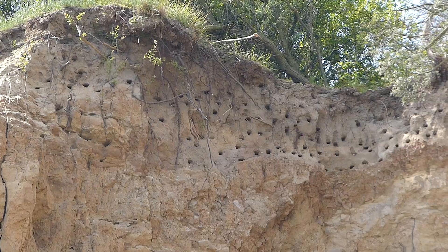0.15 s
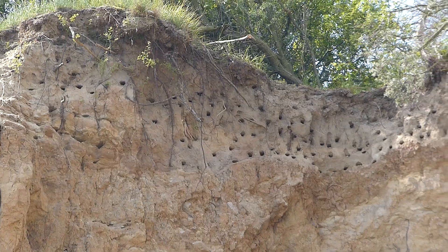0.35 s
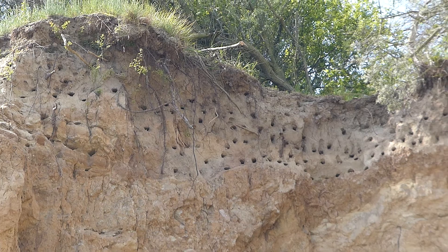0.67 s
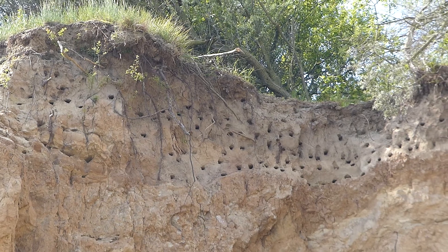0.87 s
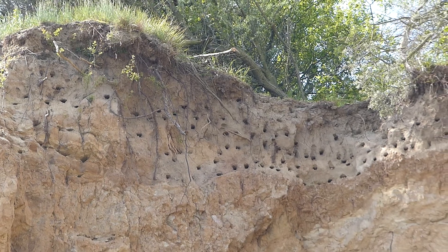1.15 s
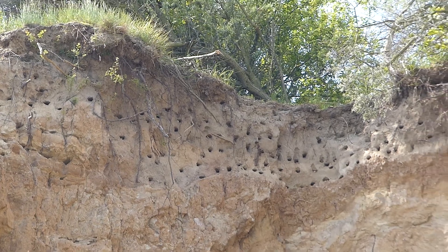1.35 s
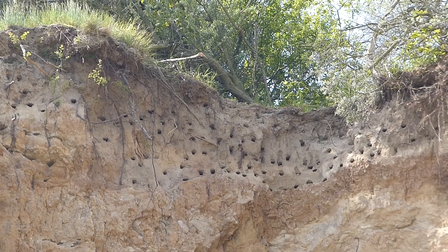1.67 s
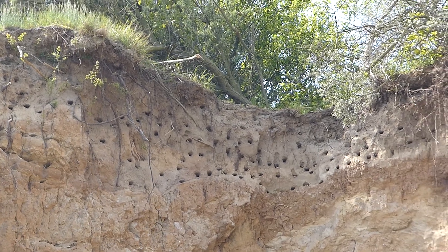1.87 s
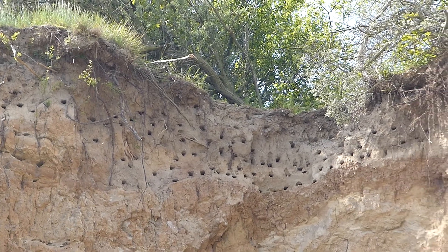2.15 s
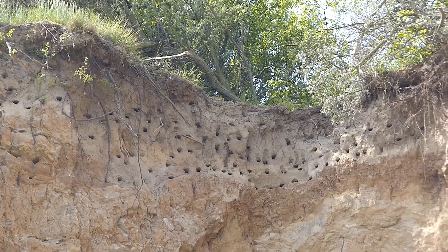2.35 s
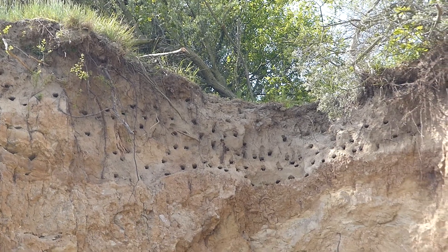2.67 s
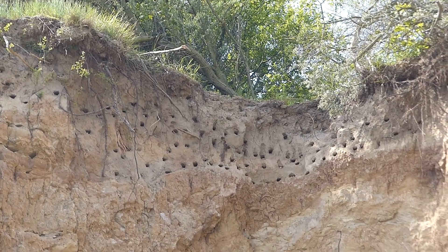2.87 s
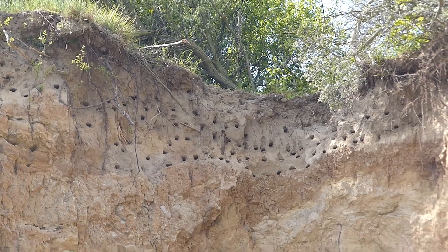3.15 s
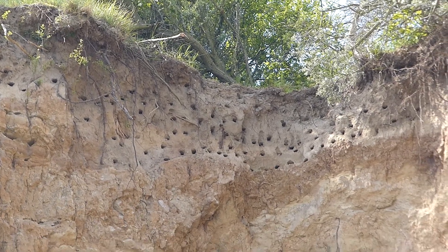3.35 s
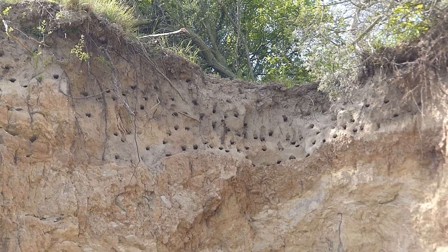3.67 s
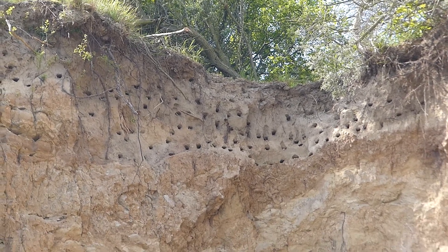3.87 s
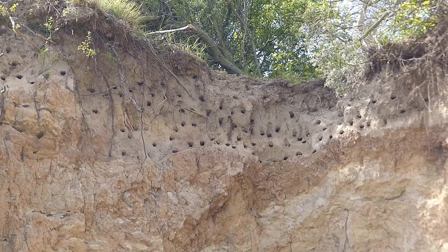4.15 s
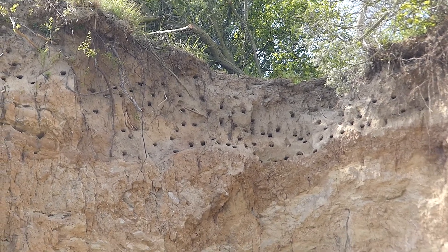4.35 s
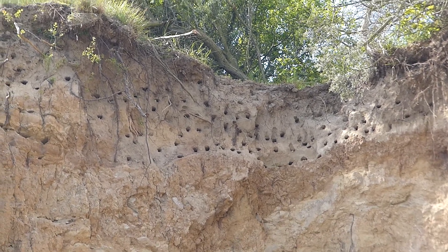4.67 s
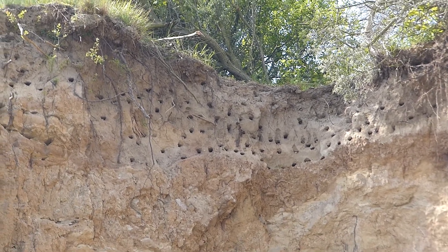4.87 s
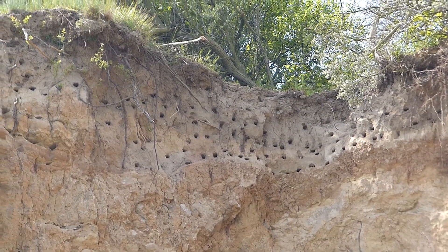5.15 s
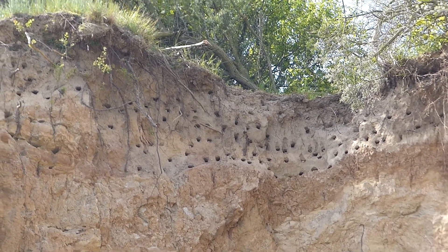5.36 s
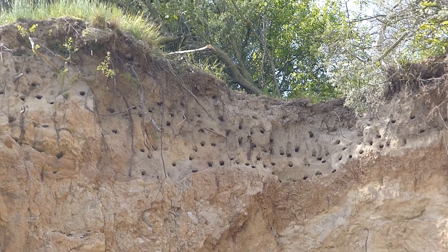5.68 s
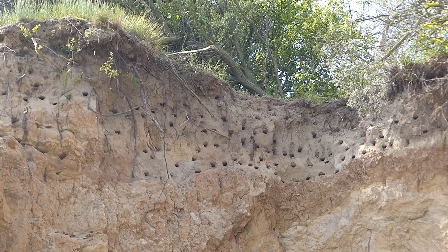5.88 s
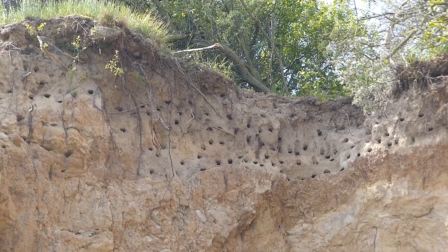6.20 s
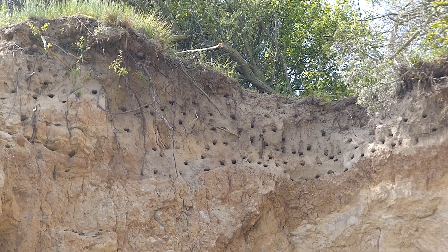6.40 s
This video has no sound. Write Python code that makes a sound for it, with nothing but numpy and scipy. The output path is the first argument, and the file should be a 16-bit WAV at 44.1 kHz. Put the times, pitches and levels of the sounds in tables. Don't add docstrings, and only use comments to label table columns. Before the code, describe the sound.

Martins rasp and chatter around a sandy bank while other birds whistle and trill, with wind buffeting, motor pulses and knocks on the camera.

```python
import sys
import numpy as np
from scipy import signal
from scipy.fft import rfft, irfft, next_fast_len
from scipy.io import wavfile
from scipy.ndimage import uniform_filter1d

SR = 44100
rng = np.random.default_rng(int(sys.argv[2]) if len(sys.argv) > 2 else 0)


def gain_from_db(level_db):
    decades = np.asarray(level_db, float) / 20
    return 10 ** decades


def pcm_store(signal):
    levels = np.round(np.clip(np.atleast_2d(signal), -1, 1) * 32767)
    wavfile.write(sys.argv[1], SR, levels.astype(np.int16).T)


N = 287973
TIME = np.arange(N) / SR


def noise(points):
    hz, db = np.transpose(points)
    size = next_fast_len(N, True)
    bins_hz = np.maximum(np.fft.rfftfreq(size, 1 / SR), 1)
    gain = gain_from_db(np.interp(np.log(bins_hz), np.log(hz), db, -70, -70))
    x = irfft(rfft(rng.standard_normal(size)) * gain, size)[:N]
    return x / x.std()


def walk(rate):
    k = int(SR / rate)
    held = np.repeat(rng.standard_normal(N // k + 1), k)
    x = uniform_filter1d(uniform_filter1d(held, k), k)[:N]
    return x / x.std()


def add(out, s, sound, pan):
    i = int(np.clip(s * SR, 0, N))
    out[:, i:i + len(sound)] += np.outer([1, pan], sound[:N - i])


def whistle(shape, wobble_hz, wobble_rate, throb_db):
    s, hz, db = np.transpose(shape)
    t = np.arange(s[0], s[-1], 1 / SR)
    knots = np.arange(s[0], s[-1] + .02, 1 / wobble_rate)
    draws = rng.standard_normal((2, 256))[:, :len(knots)]
    pitch_tremble, level_tremble = [np.interp(t, knots, c) for c in draws]
    pitch_hz = np.interp(t, s, hz) + wobble_hz * pitch_tremble
    level_db = np.interp(t, s, db) + throb_db * level_tremble
    return np.sqrt(2) * gain_from_db(level_db) * np.sin(2 * np.pi * np.cumsum(pitch_hz) / SR)


def chip(hz, db, length_s, glide):
    t = np.arange(int(length_s * SR)) / SR
    return gain_from_db(db) * np.hanning(len(t)) * np.sin(2 * np.pi * hz * t * (1 + glide * (t / length_s - 1)))


def bank(x, t60_s, gap_s):
    t = np.arange(int(.8 * SR)) / SR
    tails = rng.standard_normal((2, len(t))) * np.exp(-np.log(1000) * t / t60_s) * (t > gap_s)
    tails /= np.sqrt(np.sum(tails ** 2, axis=1, keepdims=True))
    tails = signal.sosfilt(signal.butter(2, 6000, fs=SR, output="sos"), tails)
    return signal.fftconvolve(x[None], tails, axes=1)[:, :N]


def air():
    # frequency in Hz, density in dB per Hz.
    centre_tone = [(180, -42.5), (300, -13), (378, -12), (686, -11.5), (796, -3.5), (879, -8),
                   (1290, -12.5), (3090, -20), (4900, -18), (6600, -23), (8460, -24), (13400, -30.5),
                   (15600, -36)]
    across_tone = [(290, -34), (500, -8), (621, 0), (727, -7), (804, -8), (956, -14), (2470, -27.5),
                   (4860, -31), (10400, -36.5), (14300, -41), (15600, -59.5)]
    # end in seconds, centre in Hz, width in Hz, centre level in dB, across level in dB.
    hums = [
        (5, 645, 29, -81.5, -66.5),
        (0.15, 905, 59, -60.5, -80),
        (.15, 530, 190, -61.5, -65),
    ]
    swell = gain_from_db(.4 * walk(1.5))
    out = swell * np.array([gain_from_db(-58.5) * noise(centre_tone), gain_from_db(-52) * noise(across_tone)])
    for end_s, hz, width, centre_db, across_db in hums:
        skirt = [(hz - 2 * width, -20), (hz - width / 2, -3), (hz, 0),
                 (hz + width / 2, -3), (hz + 2 * width, -20)]
        hum = noise(skirt) * (TIME < end_s)
        out += np.outer([gain_from_db(centre_db), -gain_from_db(across_db)], hum)
    return out


def far_flock():
    # time in seconds, level in dB.
    high_flock = [(0, -70), (.33, -81), (.65, -80), (.95, -67), (1.6, -76), (2.1, -62), (3.3, -65),
                  (3.8, -56), (4.2, -61), (4.7, -61), (5.0, -69), (5.8, -67), (6.53, -69)]
    low_flock = [(0, -72), (.33, -90), (1.2, -73.5), (2.1, -60), (2.5, -65.5), (4.2, -64), (5.2, -69.5),
                 (5.9, -59.5), (6.2, -62), (6.53, -61.5)]
    out = np.zeros((2, N))
    for hz, spread_hz, rate, group in ((4966, 476, 260, high_flock), (4030, 260, 320, low_flock)):
        group_s, group_db = np.transpose(group)
        for k, (late, pitch, size) in enumerate(rng.standard_normal((int(rate * N / SR), 3))):
            when = (k + 2 * late) / rate % TIME[-1]
            db = np.interp(when, group_s, group_db) - 1 + 6 * np.tanh(size / 1.8)
            add(out, when, chip(hz + spread_hz * pitch, db, 0.007, 0.01), -.1)
    return 0.83 * out + gain_from_db([[-2.5], [-7]]) * bank(out[0], 0.4, 0.0054)


def wind():
    # time in seconds, force in dB, flutter above it in dB.
    force = [(0, -65, 0), (.33, -57, -12.5), (.52, -72, -14), (.64, -61, -6), (.9, -59.5, -8),
             (1.05, -53, -10), (1.8, -49.5, -9.5), (2.05, -47, -18.5), (2.42, -49, -9.5),
             (2.75, -45, -14.5), (2.95, -54, -16), (3.1, -60, -8), (3.4, -61.5, -6), (3.85, -58.5, -6),
             (4.15, -64, -3), (4.9, -54, -9), (5.7, -54, 3), (6.53, -55.5, -3)]
    # time in seconds, level in dB.
    gusts = [(.35, 4.5), (.44, 2.5), (.635, 4.5), (.76, 8.5), (1.02, 8), (1.13, -2), (1.84, -4.5),
             (2.27, -2.5), (2.41, -6), (2.54, 3), (3.5, 7), (3.78, 5), (4.0, 2.5), (4.33, 6.5), (4.57, 2),
             (4.75, -4), (4.83, 3), (5.2, -0.5), (5.4, 2.5), (5.5, -1.5), (5.61, 5.5), (5.71, 5),
             (5.82, 0.5), (6.05, 3.5), (6.15, -3), (6.38, -3)]
    # frequency in Hz, density in dB per Hz.
    across_tone = [(35, -27.5), (60, -23), (90, -7), (160, 2), (240, 1), (330, -5.5), (450, -14),
                   (650, -31), (1000, -36.5)]
    centre_tone = [(35, -17), (55, -22.5), (80, -5), (110, 0.5), (150, 2.5), (200, -4.5), (300, -19)]
    flutter_tone = [(110, -25), (170, 1.5), (230, 1), (320, -7.5), (480, -10), (700, -19.5), (1200, -34)]
    gust_s, across_over_db = 0.082, 19
    s, *columns = np.transpose(force)
    force_db, flutter_db = (np.interp(TIME, s, c) for c in columns)
    force_db = force_db + sum(db * np.exp(-(2 * (TIME - at) / gust_s) ** 2) for at, db in gusts)
    eddies = uniform_filter1d(walk(75), SR // 100)
    eddies -= uniform_filter1d(eddies, SR // 12)
    across = gain_from_db(force_db + across_over_db - 1.3 + 2.2 * eddies) * noise(across_tone)
    centre = gain_from_db(force_db + .4 + 1.2 * eddies) * noise(centre_tone)
    flutter_level = gain_from_db(force_db + flutter_db + 4.0 + 1.9 * eddies + 2.25 * walk(60))
    flutter = flutter_level * noise(flutter_tone)
    return np.array([centre + flutter - 0.062 * across, across])


def lens_motor():
    pulse_db = [-57, -56, -58.5, -49, -57, -50, -55, -58, -54, -56, -54, -53, -55.5, -55, -60, -55, -53.5,
                -58, -53, -45.5, -52, -52.5, -54.5, -49.5, -52, -53.5, -52.5, -53.5, -51.5, -57, -54.5,
                -53.5, -56, -59.5, -56, -56.5, -57, -55, -54.5, -54.5, -50, -53, -54, -53, -55, -54.5,
                -52.5, -55, -53, -51.5, -54, -54]
    motor_hz, first_s, every_s, pan = 800, .3665, .12, 0.75
    attack_s, hold_s, release_s, rise_db = 0.0034, 0.034, 0.016, 1.5
    gate = np.zeros((2, N))
    t = TIME[:SR // 14]
    pulse = np.interp(t, [0, attack_s, hold_s, hold_s + release_s], [0, 1, gain_from_db(rise_db), 0])
    for k, db in enumerate(pulse_db):
        add(gate, first_s + k * every_s, gain_from_db(db) * pulse, pan)
    return gate * gain_from_db(1.2 * walk(60)) * np.sin(2 * np.pi * motor_hz * TIME + .35 * walk(40))


def handling():
    # start in seconds, peak in dB, second mode in Hz, its level in dB, bounce in dB.
    knocks = [
        (.83, -50.5, 1137, 1.5, -5),
        (1.39, -50, 1140, -3, -1),
        (3.355, -36, 1033, -6.5, -3.5),
        (3.891, -34.5, 1140, -10, -3),
        (4.421, -37.5, 1140, -12, -3.5),
    ]
    # start in seconds, peak in dB, pan.
    ticks = [
        (3.122, -36.5, .1),
        (2.666, -54, .1),
    ]
    body_hz, t60_s, bounce_s = 586.5, 0.11, 0.018
    out = np.zeros((2, N))
    t = TIME[:SR // 8]
    for s, db, upper_hz, upper_db, bounce_db in knocks:
        upper = gain_from_db(upper_db) * np.sin(2 * np.pi * upper_hz * t) * np.exp(-t / 0.024)
        ring = np.sin(2 * np.pi * body_hz * t) + upper
        ring *= gain_from_db(db) * (1 - np.exp(-t / 0.00041)) * np.exp(-np.log(1000) * t / t60_s)
        add(out, s, ring, -.3)
        add(out, s + bounce_s, gain_from_db(bounce_db) * ring, -.3)
    for s, db, pan in ticks:
        snap = np.exp(-t / .00004) + .25 * np.exp(-t / .003)
        add(out, s, gain_from_db(db) * snap * np.cos(2 * np.pi * 1400 * t), pan)
    return out


def songbirds():
    # time about its top in seconds, pitch in Hz, level in dB.
    low_voice = [(-.165, 2600, -16), (-.11, 2837, -7), (-.07, 3124, -1), (-.03, 3552, 0), (0, 4060, 5),
                 (.025, 4097, -7), (.045, 4070, -20)]
    high_voice = [(0, 4614, -10), (.015, 4790, 7.5), (.055, 5340, 1.5), (.095, 6000, -2.5),
                  (.12, 6300, -12)]
    after_trill = [(-.01, 4048, -14), (.01, 4060, -1), (.06, 4010, -5), (.085, 3990, -11), (.14, 3975, -20)]
    hoarse_undertone = [(-.025, 3450, -7), (0, 3680, -1), (.05, 3720, -3), (.085, 3620, -14)]
    # top in seconds, low voice in dB, trill in dB, high voice in dB, pan.
    rises = [
        (.89, -62, -55.5, -66, -.68),
        (1.925, -60, -56.5, -65.5, -.8),
        (2.893, -62.5, -60, -68, -.66),
        (3.825, -66, -57, -67, -.5),
        (4.745, -61, -56.5, -66.5, -.55),
        (5.69, -60.5, -56, -90, -.5),
    ]
    # start in seconds, length in seconds, from Hz, to Hz, level in dB.
    piping = [
        (.07, .03, 4750, 4680, -68),
        (0, .14, 3900, 3810, -73),
        (.3, .145, 2370, 2360, -66.5),
        (.61, .035, 2360, 2320, -77),
        (1.17, .04, 4000, 4000, -72),
    ]
    clear = [
        (2.2, .044, 4320, 4260, -52.5),
        (2.245, .05, 4165, 4170, -53),
        (2.665, .055, 3430, 3320, -61),
        (2.7, .03, 4550, 4600, -61),
        (2.805, .028, 3400, 4140, -62),
        (2.4, .05, 4180, 4150, -66),
    ]
    husky = [(.06, .035, 10300, 10500, -73), (2.15, .05, 8400, 8350, -72), (2.24, .06, 8150, 8400, -70),
             (2.48, .09, 8750, 8650, -80), (2.76, 0.044, 8500, 8550, -74), (3.25, .04, 8550, 8600, -74),
             (3.48, 0.081, 8600, 8550, -77), (3.83, 0.076, 8450, 8550, -73), (4.04, .08, 8400, 8650, -70.5),
             (4.33, .07, 8500, 8600, -77), (4.78, .11, 8450, 8500, -73), (5.33, 0.18, 8500, 8700, -76)]
    trills = [(1.04, .09, 4030, 4150, -67), (2.12, 0.076, 4060, 4000, -60), (2.285, 0.067, 3460, 3570, -63),
              (2.33, 0.11, 3900, 3800, -61.5), (2.415, 0.04, 3130, 3150, -63), (2.47, .09, 3350, 3500, -65),
              (2.36, .08, 4200, 4200, -67), (2.5, .1, 4550, 4650, -66), (2.36, .07, 3550, 3500, -66),
              (2.57, 0.04, 3140, 3000, -66), (2.51, 0.13, 3790, 3800, -63), (2.65, .045, 3620, 3780, -59),
              (2.72, 0.08, 3820, 3790, -61), (2.9, 0.1, 4000, 3950, -60), (2.9, .1, 4700, 4750, -63.5),
              (2.87, .13, 3450, 3700, -62), (3.16, 0.04, 2900, 2900, -69), (4.07, 0.12, 3250, 3500, -65.5),
              (3.76, 0.22, 4950, 4900, -62), (6.14, .1, 4050, 4050, -64), (3.79, .06, 3300, 3400, -64),
              (3.62, .04, 4750, 4850, -62), (3.865, .035, 5000, 5100, -59)]
    held = [
        (3.255, 0.065, 2950, 2930, -69),
        (3.345, .105, 2930, 2920, -72),
        (3.46, .05, 2800, 2830, -71),
        (3.565, .11, 2920, 2880, -73),
        (3.83, .06, 2750, 2900, -70),
        (.45, .11, 2360, 2340, -79),
    ]
    # start in seconds, starting pitch in Hz, level in dB.
    dives = [
        (3.058, 6550, -60),
        (3.298, 6400, -59.5),
    ]
    # time in seconds, share of starting pitch, level in dB.
    dive_shape = [(0, 1, -6), (.01, .985, -1), (.03, .915, 0), (.055, .77, -1), (.068, .68, -1),
                  (.084, .6, -4), (.092, .57, -16)]
    high_lead_s = .186
    out, flyby = np.zeros((2, 2, N))
    for s, low_db, trill_db, high_db, pan in rises:
        add(out, s + low_voice[0][0], gain_from_db(low_db) * whistle(low_voice, 45, 300, 3.5), pan)
        add(out, s + after_trill[0][0], gain_from_db(trill_db) * whistle(after_trill, 125, 550, 4.5), pan)
        burr = gain_from_db(trill_db - 2.5) * whistle(hoarse_undertone, 263, 699, 2.2)
        add(out, s + hoarse_undertone[0][0], burr, pan)
        add(out, s - high_lead_s, gain_from_db(high_db) * whistle(high_voice, 60, 250, 2.5), -.5)
    # notes, wobble Hz, throb dB, pan, target
    voices = ((piping, 20, 2.5, -.4, flyby), (clear, 20, 2.5, .1, flyby), (husky, 110, 4, -.28, out),
              (trills, 170, 4.5, -.2, out), (held, 70, 4, -.2, out))
    for notes, wobble_hz, throb_db, pan, target in voices:
        for s, length, from_hz, to_hz, db in notes:
            shape = [(0, from_hz, db - 9), (.12 * length, from_hz, db),
                     (.9 * length, to_hz, db - 2), (length, to_hz, db - 11)]
            add(target, s, whistle(shape, wobble_hz, 700, throb_db), pan)
    for s, hz, db in dives:
        add(flyby, s, gain_from_db(db) * whistle(np.multiply(dive_shape, [1, hz, 1]), 90, 380, 2.2), .24)
    echo = bank(out[0] + gain_from_db(-11.0) * flyby[0], 0.69, 0.0098)
    return out + flyby + gain_from_db([[-1.5], [-5]]) * echo


def martins():
    # start in seconds, length in seconds, centre in Hz, level in dB.
    rattles = [(1.285, .045, 4100, -62), (1.38, .045, 4150, -60.5), (1.472, .09, 4150, -58),
               (3.24, .028, 4530, -56), (4.089, .03, 5530, -60), (4.09, .06, 4730, -60),
               (4.28, .16, 5320, -57.5), (4.49, .06, 5500, -56.5), (5.1, .05, 6100, -64),
               (5.33, .035, 6000, -61), (5.43, .03, 6200, -61), (5.94, 0.082, 5900, -64),
               (2.515, .04, 6000, -64)]
    chatter = [(3.46, 0.099, 4600, -56.5), (4.861, 0.089, 4840, -56.5), (4.98, 0.069, 5040, -54.5),
               (5.085, 0.073, 5080, -55), (5.193, 0.064, 4980, -57.5), (5.302, 0.061, 4900, -55.5),
               (5.41, 0.056, 5030, -52.5), (5.515, 0.076, 5000, -52.5), (5.634, 0.067, 5030, -52.5),
               (5.74, 0.064, 5240, -56), (5.86, .05, 4900, -56), (5.931, 0.11, 5100, -55),
               (6.111, 0.036, 4930, -56.5), (6.2, 0.04, 4970, -54.5), (6.297, 0.063, 4930, -55),
               (6.297, 0.056, 4070, -53.5), (6.41, 0.062, 4930, -52), (6.516, .02, 5000, -52)]
    buzzes = [
        (2.354, 0.049, 1610, -53),
        (2.655, .02, 6900, -64),
        (3.721, .2, 5260, -59),
        (3, .4, 3260, -63),
        (3.85, 0.44, 2900, -66.5),
        (3.45, .25, 2640, -63),
    ]
    murmurs = [(.83, .07, 4800, -65), (.96, 0.036, 4700, -66), (1.04, 0.084, 4670, -63.5),
               (1.16, 0.071, 4580, -65), (2.1, 0.12, 4880, -66), (2.3, 0.082, 4720, -64.5),
               (2.43, .12, 6030, -71), (3.46, 0.079, 4080, -65), (3.6, 0.069, 3900, -66),
               (5.33, 0.13, 4120, -64)]
    # start in seconds, peak in dB, pitch in Hz.
    accents = [(2.1974, -50, 5250), (2.6643, -52, 4860), (3.0135, -54, 5450), (4.1594, -51, 5380),
               (4.1774, -51, 5400), (4.1939, -52, 5360), (4.2118, -48, 5100), (4.8868, -48, 4690),
               (4.924, -51, 4770), (4.9811, -50, 5110), (5.0004, -52, 4770), (5.0424, -49, 5360),
               (5.0464, -51, 5060), (5.0868, -49, 5100), (5.1153, -50, 5080), (5.1474, -51, 4840),
               (5.1911, -52, 4980), (5.24, -51, 4900), (5.2534, -53, 4690), (5.3063, -49, 4910),
               (5.323, -53, 4650), (5.4226, -47, 5470), (5.452, -51, 5020), (5.5124, -49, 4700),
               (5.5253, -43, 4940), (5.5653, -52, 4860), (5.6366, -48, 5030), (5.7426, -50, 5650),
               (5.8865, -51, 4840), (5.9379, -50, 5180), (5.9647, -49, 5190), (6.0053, -50, 4770),
               (6.0222, -47, 4890), (6.0374, -49, 5210), (6.114, -52, 5220), (6.1315, -50, 5160),
               (6.2048, -51, 5280), (6.2153, -49, 4700), (6.3335, -49, 4670), (6.4198, -44, 4990),
               (6.439, -43, 4710), (6.4564, -46, 4970)]
    # time in seconds, pitch in Hz, level in dB.
    alarm = [(1.205, 6950, -73), (1.225, 7150, -64), (1.245, 7250, -60), (1.268, 7500, -59),
             (1.29, 8000, -64), (1.31, 7500, -63), (1.33, 7000, -64), (1.36, 6600, -67), (1.42, 6400, -78)]
    out = np.zeros((2, N))
    # bursts, clicks per s, spread, click s, hurry (below 1 speeds up to the end)
    manners = ((rattles, 72, .04, .0035, 1), (chatter, 200, .09, .002, .8),
               (buzzes, 210, .13, .003, 1), (murmurs, 260, .06, .005, 1))
    for bursts, rate, spread, click_s, hurry in manners:
        for s, length, hz, db in bursts:
            chance = np.tanh(.7 * rng.standard_normal((128, 5)))
            count = int(length * rate) + 1
            for k, (late, pitch, size, glide, stretch) in enumerate(chance[:count]):
                when = s + length * (k / count) ** hurry + 3 * spread * late / rate
                click_hz = hz * (1 + spread * (pitch + pitch ** 2))
                click = chip(click_hz, db + 4 + 4 * size, click_s * gain_from_db(5 * stretch), .06 + .16 * glide)
                add(out, when, click, -.15)
    for s, db, hz in accents:
        add(out, s, chip(hz, db + 2.5, .002, .15), -.15)
    # delay s, pitch ratio
    for late_s, pitch in ((0, 1), (.004, 1.02), (.02, .97), (.035, 1.04)):
        call = whistle(np.multiply(alarm, [1, pitch, 1]), 230, 800, 5)
        add(out, alarm[0][0] + late_s, gain_from_db(-6) * call, -.5)
    return out + gain_from_db([[-6.5], [-10]]) * bank(out[0], .3, .008)


def scene():
    centre, across = air() + far_flock() + wind() + lens_motor() + handling() + songbirds() + martins()
    return np.array([centre + across, centre - across])


def top_cut(x):
    return signal.sosfilt(signal.butter(12, 15750, fs=SR, output="sos"), x)


def record(dry):
    # time in seconds, gain in dB.
    settle = [(0, 0.5), (.32, -2), (.5, -2), (.8, -1.5)]
    # frequency in Hz, density in dB per Hz.
    trace_tone = [(150, -10), (350, -0.5), (1000, -6), (2500, -12), (5000, -5), (7000, -15), (11000, -14.5),
                  (15000, -19.5)]
    cut_s = (.1198, .3213)
    narrow_s, narrow_db, mono_s, trace_db = 2.6255, -6.5, 5.3775, -74.5
    offset, fade_s = -.0032, .0015
    dry = dry * gain_from_db(np.interp(TIME, *np.transpose(settle)))
    centre, across = (dry[0] + dry[1]) / 2, (dry[0] - dry[1]) / 2
    across = across * np.where(TIME < narrow_s, 1, gain_from_db(narrow_db)) * (TIME < mono_s)
    across += gain_from_db(trace_db + 3.5 * walk(40)) * noise(trace_tone) * (TIME >= mono_s)
    edges_s = [cut_s[0] - fade_s, cut_s[0] + fade_s, cut_s[1] - fade_s / 2, cut_s[1]]
    cut = np.interp(TIME, edges_s, [1, 0, 0, 1])
    return top_cut((np.array([centre + across, centre - across]) + offset) * cut)


dry = scene()
out = record(dry)
pcm_store(out)
```